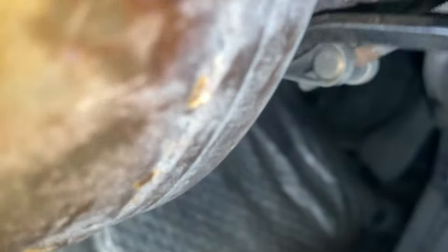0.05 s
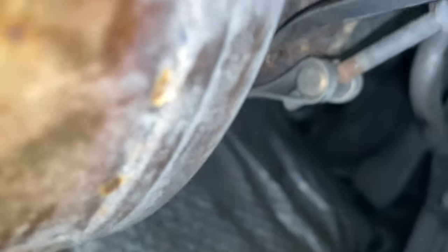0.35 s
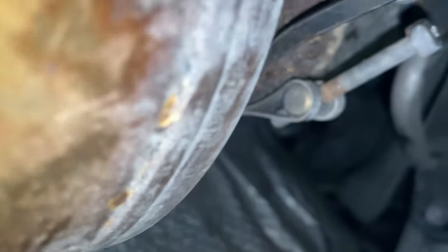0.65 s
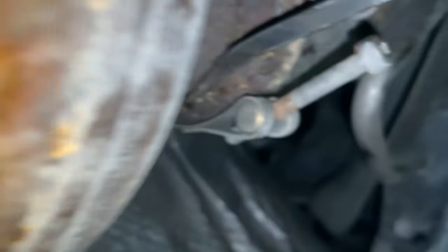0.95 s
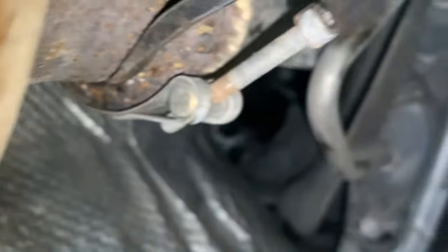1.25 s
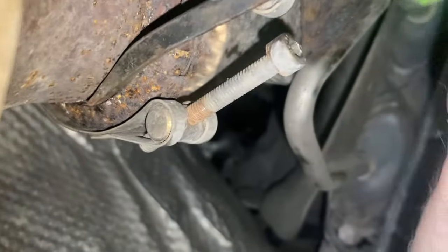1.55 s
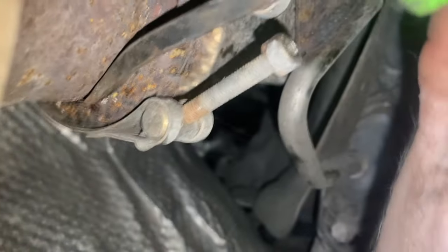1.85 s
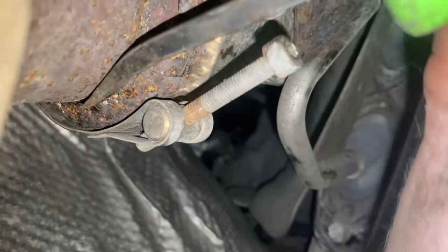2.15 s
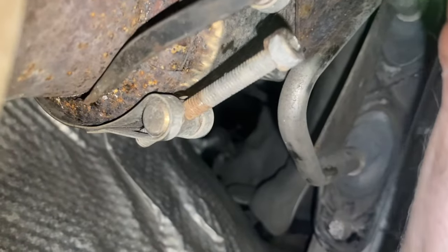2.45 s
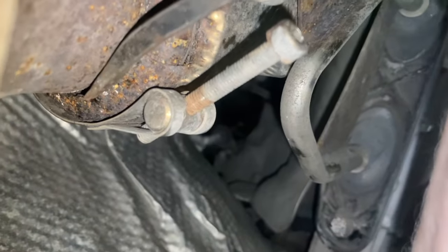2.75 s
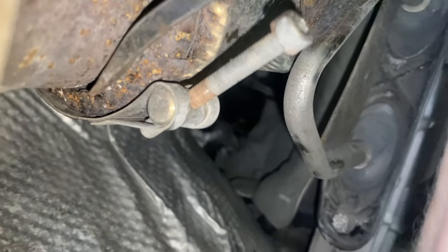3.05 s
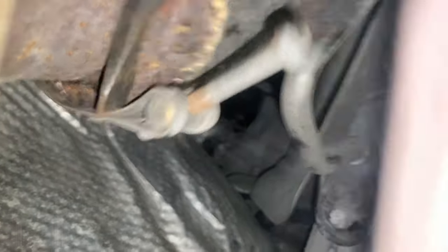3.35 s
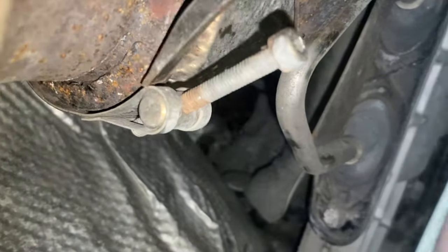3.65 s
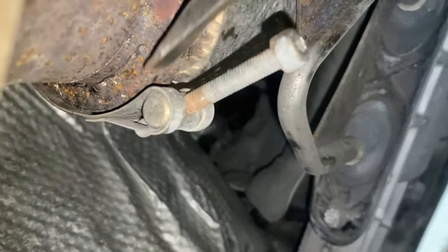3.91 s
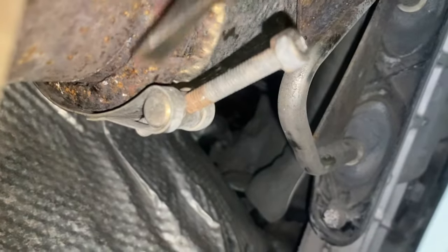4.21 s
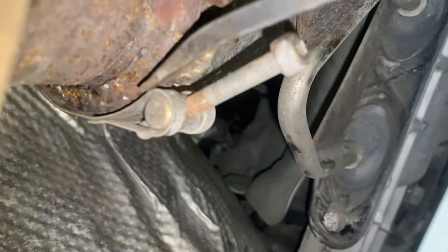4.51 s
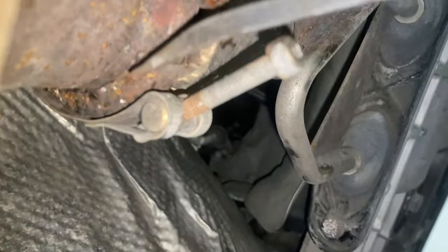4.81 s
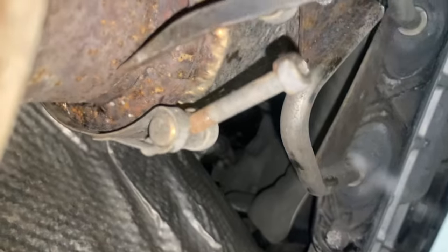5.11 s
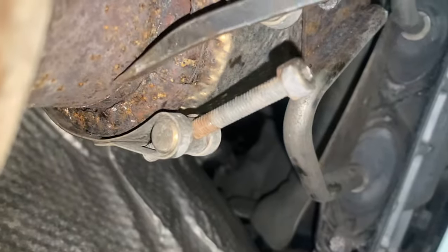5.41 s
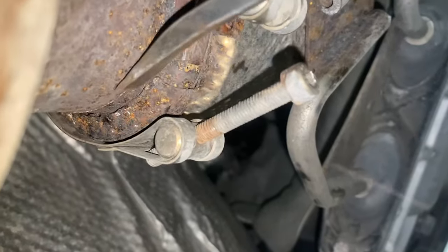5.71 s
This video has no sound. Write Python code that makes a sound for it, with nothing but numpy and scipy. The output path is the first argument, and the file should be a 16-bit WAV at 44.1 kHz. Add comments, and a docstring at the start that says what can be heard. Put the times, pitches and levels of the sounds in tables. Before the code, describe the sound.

Under a car in a quiet garage, a steel pry bar works at a rusted exhaust clamp. It starts with a short clank and light scrapes, while rust flakes snap off with dry ticks. Just past halfway comes a loud knock, then more clanks and gritty scraping, and the bar rings briefly near the end. A hand bumps and rumbles on the close microphone, and the room adds a faint echo.

```python
"""A hand bumps and rumbles on the microphone while, close by, a steel pry bar scrapes at a
rusted exhaust clamp under a car. Stick-slip friction drives the resonant modes of the pipe, and hard
slips excite clamp, bar and pipe into clanks. Brittle rust flakes snap off with dry ticks.
The garage adds a faint reverberant tail and the low noise of its still air."""
import sys
import numpy as np
from scipy import signal
from scipy.fft import rfft, irfft
from scipy.io import wavfile
from scipy.ndimage import uniform_filter1d, minimum_filter1d

SR = 44100
rng = np.random.default_rng(int(sys.argv[2]) if len(sys.argv) > 2 else 0)


def waveform_to_disk(signal):
    """Save audio, clipped to [-1, 1], as 16-bit WAV at the path in sys.argv[1]."""
    frames = np.transpose(np.atleast_2d(signal))
    scaled = np.clip(frames, -1, 1) * 32767
    samples = np.round(scaled).astype(np.int16)
    wavfile.write(sys.argv[1], SR, samples)


N = 254456
TIME = np.arange(N) / SR
BITE_S, LET_GO_S = 0.0059, 0.023   # rise and fall time constants of a firm contact


def from_db(db):
    return 10 ** (np.asarray(db) / 20)


def rms_one(x):
    return x / np.sqrt(np.mean(x ** 2) + 1e-20)


def energy_one(x):
    return x / np.sqrt(np.sum(x ** 2) + 1e-20)


def add(track, start_s, sound):
    """Superposition: a sound sums into the track from its start time."""
    at = max(round(start_s * SR), 0)
    track[at:at + len(sound)] += sound[:N - at]


def band(x, low_hz, high_hz):
    """First-order band-pass filtering."""
    return signal.sosfilt(signal.butter(1, [low_hz, high_hz], "band", fs=SR, output="sos"), x + 1e-18)


def through(x, response):
    """Convolution: a linear system responds to every sample of its input."""
    return signal.fftconvolve(x, response)[:N]


def colour(spectrum, size=8192):
    """Minimum phase: the causal, unit-energy response with a spectrum of (Hz, dB) points."""
    hz, db = np.transpose(spectrum)
    bins_hz = np.fft.rfftfreq(size, 1 / SR)
    gain = from_db(np.interp(np.log(bins_hz + 1), np.log(hz), db))
    causal_cepstrum = 2 * irfft(np.log(gain))[:size // 2]
    return energy_one(irfft(np.exp(rfft(causal_cepstrum, size)))[:size // 2])


def drift(per_s):
    """Random modulation: linear interpolation between Gaussian values."""
    knots = rng.standard_normal(int(per_s * N / SR) + 2)
    return np.interp(TIME * per_s, np.arange(len(knots)), knots)


def grains(per_s, spread_db):
    """Shot noise: impulses at random moments, mostly small, a few large."""
    sizes = from_db(spread_db * np.minimum(rng.exponential(1, N), 4)) * rng.choice([-1, 1], N)
    return rms_one(sizes * (rng.random(N) < per_s / SR))


def swell(start_s, length_s, rise_s, fall_s):
    """Exponential rise and fall around a gain of 1 while a contact lasts."""
    before = np.maximum(start_s - TIME, 0) / rise_s
    after = np.maximum(TIME - start_s - length_s, 0) / fall_s
    return np.exp(-np.minimum(before + after, 30))


def dying_noise(t60_s):
    """Modal overlap: dense resonances or echoes merge into decaying noise of unit energy."""
    return energy_one(rng.standard_normal(SR) * from_db(-60 * TIME[:SR] / t60_s))


def ringing(modes, t60_share=1):
    """Free vibration: a struck body sounds as a sum of damped sinusoids, here of unit energy."""
    t, ring = TIME[:SR], 0
    for hz, db, t60_s in modes:
        decay = from_db(-60 * t / (t60_s * t60_share))
        ring = ring + from_db(db) * energy_one(np.sin(2 * np.pi * hz * t) * decay)
    return energy_one(ring)


# The still air's spectrum. Each row: frequency in Hz, relative level in dB.
AIR_SPECTRUM = [(30, 5), (120, -3), (450, -25.5), (630, -16), (850, -41.5), (10000, -51.5), (13000, -74)]


def still_air():
    """Stationary noise, strongest in the bass, forms the garage's noise floor."""
    return from_db(-50) * through(rng.standard_normal(N), colour(AIR_SPECTRUM))


def garage_tail(sound):
    """Reverberation: diffuse reflections decay exponentially."""
    return from_db(-24.5) * band(through(sound, dying_noise(t60_s=1)), low_hz=292.3, high_hz=5510)


# The spectrum of sliding skin. Each row: frequency in Hz, relative level in dB.
RUB_SPECTRUM = [(150, -8.5), (400, -8), (650, 5.5), (900, -12), (2000, -37)]
# Skin slides on the microphone's case. Each row: start in seconds, length in seconds, level in dB.
SKIN_RUBS = [(0.349, 0.055, -32.5), (1.934, 0.11, -51), (2.19, 0.023, -52), (4.67, 0.097, -73)]


def skin_rubs():
    """Sliding friction: many tiny slips of skin merge into a muffled rub."""
    envelope = sum(from_db(db) * swell(s, length_s, BITE_S, LET_GO_S) for s, length_s, db in SKIN_RUBS)
    return through(envelope * grains(per_s=350, spread_db=4), colour(RUB_SPECTRUM))


# The case's response to a thud. Each row: frequency in Hz, relative level in dB.
CASE_SPECTRUM = [(15, -29.5), (42, -3.5), (61, 3), (84, -2), (150, -19), (260, -31), (600, -58.5),
                 (3000, -110)]
# The rumble of the shifting grip. Each row: time in seconds, relative level in dB.
GRIP_RUMBLE = [(0.1, -45), (0.43, -30.5), (0.67, -44.5), (1.32, -37.5), (1.65, -49.5), (2.04, -40.5),
               (2.42, -46.5), (3.4, -36), (3.57, -35), (4.05, -51), (4.73, -43.5), (4.86, -51.5),
               (5.36, -57.5)]
# The hand bumps the case. Each row: start in seconds, knock energy in dB, thud energy in dB.
HAND_BUMPS = [(0.18, -18, -40), (0.272, -18.5, 5.5), (0.355, -5, 24), (0.602, -20, -0.5), (0.838, -24, 2.5),
              (0.9, -33, 0.5), (1.177, -13, 2), (1.443, -17.5, -0.5), (1.924, -22, 29.5), (2.208, -18, 6.5),
              (2.572, -10.5, 0), (2.661, -14.5, 0.5), (2.78, -14, 5), (2.949, -12.5, 4.5), (3, -18, 3.5),
              (3.142, -13.5, 5), (3.288, -11.5, 4.5), (3.408, 9.5, 18.5), (3.469, -14, 10),
              (4.624, -25.5, -3), (5.126, -18.5, -15)]


def hand():
    """Structure-borne sound: the case carries the grip's creak and rumble and each knock and thud."""
    grip_db = np.interp(TIME, *np.transpose(GRIP_RUMBLE))
    slips = from_db(grip_db - 11) * grains(per_s=70, spread_db=6.5)
    thuds = from_db(grip_db + 7) * grains(per_s=260, spread_db=2.5)
    knocks = np.zeros(N)
    for start_s, knock_db, thud_db in HAND_BUMPS:
        add(knocks, start_s, from_db([knock_db]))
        add(thuds, start_s + .002, from_db([thud_db]))
    creak = colour([(50, -10), (140, -1.5), (280, -12.5), (600, -29), (3000, -91)])
    skin = colour([(60, -26), (170, 8), (350, 2.5), (750, -9), (1100, -32), (3000, -73.5)])
    return through(slips, creak) + through(knocks, skin) + through(thuds, colour(CASE_SPECTRUM))


# The spectrum of a tick of rust. Each row: frequency in Hz, relative level in dB.
TICK_SPECTRUM = [(300, -37), (1200, -4), (1900, -5.5), (3000, -10), (5200, -1.5), (10200, 2.5),
                 (12600, -16.5), (16000, -39)]


def fracture(energy_db):
    """Brittle fracture: rust releases its stress in a burst about a millisecond long."""
    t = TIME[:SR // 200]
    burst = rng.standard_normal(len(t)) * t * np.exp(-t / .0002)
    return from_db(energy_db) * energy_one(np.convolve(burst, colour(TICK_SPECTRUM)))


def rust_dust(friction_db):
    """Shot noise: the finest rust ticks at random, following part of the tip's swing in level."""
    ticks = from_db(.62 * friction_db - 25) * grains(per_s=22, spread_db=4)
    return through(ticks, colour(TICK_SPECTRUM))


def pop(hz, width):
    """Heavy damping: a broad resonance gives a brief impulse response, here of unit energy."""
    return energy_one(band(signal.unit_impulse(SR // 20), hz / (1 + width), hz * (1 + width)))


# Flakes snap off. Each row: start in seconds, crack energy in dB, hollow energy in dB, hollow
# frequency in Hz, ping energy in dB, ping frequency in Hz, delay of the second break in seconds.
FLAKE_SNAPS = [(0.6563, 4, -2, 640, -5, 1600, .00046), (1.0264, -2.5, -9, 620, -2, 5200, .0002),
               (1.099, -4, -13, 650, -4, 4300, .00022), (2.8245, -1.5, -0.5, 450, -8, 2800, .00016),
               (3.068, -2, -16, 750, -13, 1700, .0002), (3.9107, 0.5, 2.5, 500, -1, 5300, .00097),
               (5.2778, 3, 0, 400, -7, 2500, .00033)]
# Crumbs of rust tick. Each row: time in seconds, energy in dB.
CRUMB_TICKS = [(0.6333, -9), (0.713, -26), (0.742, -32), (0.87, -32), (1.1734, -26), (1.1925, -25),
               (2.0646, -19), (2.327, -27), (2.498, -32), (2.892, -31), (3.1213, -19), (3.181, -29),
               (3.2494, -25), (3.3567, -13.5), (3.6448, -9), (3.7133, -9), (3.7279, -7), (3.9714, -15),
               (4.176, -29), (4.4573, -18), (5.301, -24), (5.3535, -24)]


def rust_flakes(fracture_lead_s=.0003, second_share=.6):
    """Impulse excitation: a flake breaks twice, ringing itself and the gap behind; crumbs only tick."""
    cracks = np.zeros(N)
    for start_s, crack_db, hollow_db, hollow_hz, ping_db, ping_hz, delay_s in FLAKE_SNAPS:
        hollow = from_db(hollow_db) * pop(hollow_hz, width=.9)
        ping = from_db(ping_db) * pop(ping_hz, width=.28)
        for break_s, share in ((start_s, 1), (start_s + delay_s, second_share)):
            strength = share / np.hypot(1, second_share)   # the two breaks divide the energy
            add(cracks, break_s - fracture_lead_s, strength * fracture(crack_db))
            add(cracks, break_s, strength * (hollow + ping))
    for time_s, db in CRUMB_TICKS:
        add(cracks, time_s - fracture_lead_s, fracture(db))
    return cracks + from_db(-23) * through(cracks, ringing(PIPE_MODES))


# The spectra of rough rust and of fine grit. Each row: frequency in Hz, relative level in dB.
RUST_SPECTRUM = [(200, -3), (500, -4.5), (1100, -3.5), (2300, -1.5), (3700, -10.5), (5000, -8), (6500, -9),
                 (12000, -43.5)]
GRIT_SPECTRUM = [(3800, -36), (5300, -7), (7700, -10.5), (9000, 4), (10300, 5), (11200, -4.5),
                 (12400, -23.5), (17000, -35)]


def pipe_wall(force, grit, spots=6):
    """Each driving point has its own dense resonances, so the colour shifts as the tip moves."""
    contact = from_db(11.5) * through(force, colour(RUST_SPECTRUM))
    contact += from_db(14.5) * through(grit, colour(GRIT_SPECTRUM))
    shares = from_db(12 * np.array([drift(per_s=16) for _ in range(spots)]))
    shares /= np.sqrt(np.sum(shares ** 2, axis=0))
    return sum(through(contact * share, dying_noise(t60_s=.028)) for share in shares)


# The exhaust pipe's modes. Each row: frequency in Hz, relative level in dB, 60 dB decay in seconds.
PIPE_MODES = [(1690, -6, 0.028), (2188, -0.5, 0.016), (2577, -3, 0.021), (2945, -8, 0.022),
              (3533, -9.5, 0.15), (4427, -4.5, 0.017), (4820, -7, 0.014), (5090, -3.5, 0.012),
              (5760, -1.5, 0.01)]


def pipe_ring(force, bend=.025, swing_db=8, shifts_per_s=18):
    """Forced vibration: a moving contact drives the modes and varies the strength and pitch of each."""
    ring = 0
    for hz, db, t60_s in PIPE_MODES:
        bent_hz = hz * (1 + bend * drift(shifts_per_s))
        phasor = np.exp(2j * np.pi * np.cumsum(bent_hz) / SR)
        coupling = from_db(db) * rms_one(from_db(swing_db * np.tanh(drift(shifts_per_s))))
        pole = from_db(-60 / (t60_s * SR))
        amplitude = signal.lfilter([np.sqrt(2 * (1 - pole ** 2))], [1, -pole], force * coupling / phasor)
        ring = ring + np.real(phasor * amplitude)
    return from_db(5.5) * ring / np.sqrt(sum(from_db(db) ** 2 for _, db, _ in PIPE_MODES))


# The free bar's modes. Each row: frequency in Hz, relative level in dB, 60 dB decay in seconds.
BAR_MODES = [(1034, 0, 0.42), (4300, -9, 0.25), (5980, -10, 0.27)]


def bar_ring(force, strikes, free_from_s=4.2):
    """Contact damping: strikes on the clamp ring briefly; once the bar is free, rubbing rings it long."""
    free = from_db(-5) * through(force * (TIME > free_from_s), ringing(BAR_MODES))
    return free + through(strikes, ringing(BAR_MODES, t60_share=.27))


# Light slides along the pipe as the bar is repositioned, and firm strokes of the tip over rust; the brief row
# at 1.928 s adds a broadband burst that sounds with a knock of the hand. Each row: start in seconds, length in
# seconds, relative level in dB, grit against that level in dB.
LIGHT_SLIDES = [(0.228, 0.42, -70, -26), (1.09, 0.37, -68.5, -13), (2.75, 0.58, -77, -4),
                (5.26, 0.31, -79, -10.5)]
FIRM_STROKES = [(0.353, 0.05, -50.5, -3.5), (0.412, 0.0067, -38.5, -19), (0.527, 0.077, -63.5, 1),
                (0.801, 0.0048, -60.5, -6), (0.919, 0.0049, -59, -3.5), (0.933, 0.0031, -68, -3),
                (1.702, 0.0036, -68, -2.5), (1.928, 0.0048, -70, -2), (1.975, 0.055, -60.5, -20),
                (2.008, 0.14, -60.5, -11), (2.195, 0.022, -58, -11), (2.3, 0.048, -67.5, -1),
                (2.644, 0.02, -77, 4.5), (3.406, 0.019, -33.5, -20), (3.43, 0.17, -52, -6.5),
                (3.563, 0.078, -43.5, -9), (3.664, 0.065, -53, -11), (3.711, 0.053, -58, -7),
                (3.835, 0.0037, -50, -5), (3.863, 0.0047, -47, -14), (3.909, 0.12, -57.5, -18),
                (4.001, 0.047, -53.5, -7.5), (4.08, 0.036, -53, -7.5), (4.237, 0.028, -70, -15),
                (4.358, 0.0099, -48.5, -15), (4.872, 0.056, -57.5, -14.5), (5.013, 0.0023, -52.5, -7),
                (5.058, 0.012, -48.5, -5), (5.386, 0.0022, -62.5, -9), (5.438, 0.019, -53.5, -16)]


def friction_levels(catch_db=5, catch_s=.018, ease_db_per_s=28.5):
    """Incoherent sources add in power: the friction's level and its relative grit, both in dB."""
    contacts = []
    for start_s, length_s, db, grit_db in LIGHT_SLIDES:
        contacts.append((from_db(db) * swell(start_s, length_s, rise_s=.07, fall_s=.099), grit_db))
    for start_s, length_s, db, grit_db in FIRM_STROKES:   # each catches hard, then eases off
        caught_db = catch_db * np.exp(-np.abs(TIME - start_s) / catch_s)
        eased_db = ease_db_per_s * (np.clip(TIME - start_s, 0, length_s) - length_s / 2)
        envelope = from_db(db + caught_db - eased_db) * swell(start_s, length_s, BITE_S, LET_GO_S)
        contacts.append((envelope, grit_db))
    power = sum(envelope ** 2 for envelope, _ in contacts)
    grit_power = sum((envelope * from_db(grit_db)) ** 2 for envelope, grit_db in contacts)
    return 10 * np.log10(power), 10 * np.log10(grit_power / power)


def catches(per_s, decay_s):
    """Relaxation: the tip catches on pits at random, and each jerk jumps up and dies away."""
    jerks = rng.uniform(.3, 1, N) * (rng.random(N) < per_s / SR)
    return signal.lfilter([1], [1, -np.exp(-1 / (decay_s * SR))], jerks + 1e-18)


def scrape(friction_db):
    """Stick-slip friction: a light touch rubs evenly, a hard one stutters and grinds."""
    bite = np.interp(friction_db, [-72, -52], [0, 1])
    stutter_db = bite * (2.5 * drift(per_s=130) + 11 * np.minimum(catches(per_s=60, decay_s=.005), 1))
    grinding = bite * grains(per_s=1800, spread_db=5)
    rubbing = np.sqrt(1 - bite ** 2) * rng.standard_normal(N)
    return from_db(friction_db + stutter_db - 6.5) * (grinding + rubbing)


# The clamp's modes. Each row: multiple of its pitch, relative level in dB, 60 dB decay in seconds.
CLAMP_MODES = [(1, -5, 0.028), (1.104, -8.5, 0.036), (1.641, -12.5, 0.055)]


def clamp_ring(pitch_hz):
    """Free vibration: the struck clamp band rings in inharmonic modes."""
    return ringing([(pitch_hz * multiple, db, t60_s) for multiple, db, t60_s in CLAMP_MODES])


# The bar slips and strikes. Each row: start in seconds, level in dB, chatter time constant in seconds,
# grit gain in dB, clamp gain in dB, clamp pitch in Hz, bar gain in dB.
BAR_CLANKS = [(0.416, -35.5, 0.0039, 2.5, 45, 2232, 9), (0.424, -39, 0.0073, -12, 36, 2240, -0.5),
              (3.41, -13.5, 0.002, -3.5, 17, 2120, -7), (3.599, -19, 0.00087, 2.5, 25, 2653, 10.5),
              (3.667, -44, 0.0072, 4, 13, 2530, 28.5), (4.3518, -37.5, 0.003, 3, 8.5, 2150, 4),
              (4.363, -29, 0.0011, -16, -1, 2130, 19), (4.974, -45, 0.0071, -9.5, 11.5, 2240, 7.5)]


def pry_bar(friction_db, grit_db):
    """Friction and impact: the tip scrapes, and each hard slip chatters and rings clamp, bar and pipe."""
    force = scrape(friction_db)
    grit = force * from_db(grit_db)
    clamp, strikes, t = np.zeros(N), np.zeros(N), TIME[:SR // 8]
    for start_s, db, decay_s, grit_gain_db, clamp_db, clamp_hz, bar_db in BAR_CLANKS:
        chatter = from_db(db) * rng.standard_normal(len(t)) * np.exp(-t / decay_s)
        add(force, start_s, chatter)
        add(grit, start_s, chatter * from_db(grit_gain_db))
        add(clamp, start_s, from_db(db + clamp_db) * clamp_ring(clamp_hz))
        add(strikes, start_s, from_db([db + bar_db]))
    return pipe_wall(force, grit) + pipe_ring(force) + bar_ring(force, strikes) + clamp


def scene():
    """Superposition: metal, garage, rust and hand sum into one channel."""
    friction_db, grit_db = friction_levels()
    metal = pry_bar(friction_db, grit_db)
    garage = garage_tail(metal) + still_air()
    rust = rust_flakes() + rust_dust(friction_db)
    return (metal + garage + rust + hand() + skin_rubs())[None]


def disperse(x, q):
    """Group delay: one all-pass per octave holds back the lows, so each knock sweeps downward."""
    for hz in 62.5 * 2 ** np.arange(8):
        w = 2 * np.pi * hz / SR
        denominator = [1 + np.sin(w) / (2 * q), -2 * np.cos(w), 1 - np.sin(w) / (2 * q)]
        x = signal.lfilter(denominator[::-1], denominator, x)
    return x


def limiter(x):
    """Peak limiting: the gain ducks smoothly around any peak that would overload."""
    gain = np.minimum(1, .95 / (np.abs(x) + 1e-9))
    return x * uniform_filter1d(minimum_filter1d(gain, size=255), size=255)


def record(dry):
    """The microphone's response delays the bass and dips the treble; peaks are limited, the top cut."""
    dip_hz, dip_width_hz, cutoff_hz = 7192, 1300, 17500
    dip = signal.iirnotch(dip_hz, dip_hz / dip_width_hz, fs=SR)
    heard = signal.lfilter(*dip, disperse(dry, q=.55))
    return signal.sosfilt(signal.cheby2(12, 70, cutoff_hz, fs=SR, output="sos"), limiter(heard))


dry = scene()
out = record(dry)
waveform_to_disk(out)
```